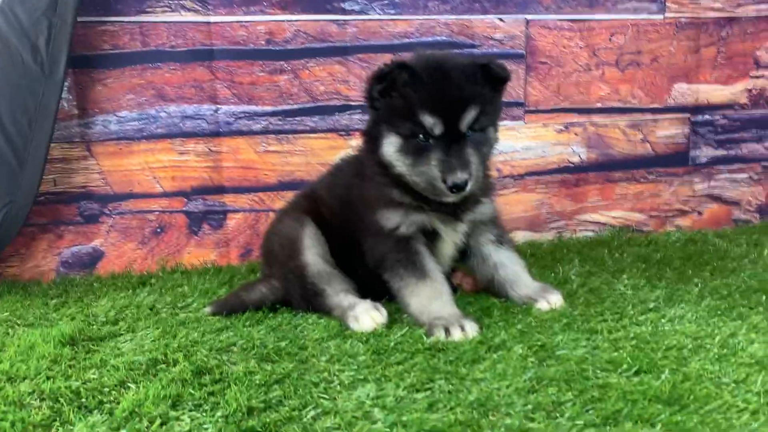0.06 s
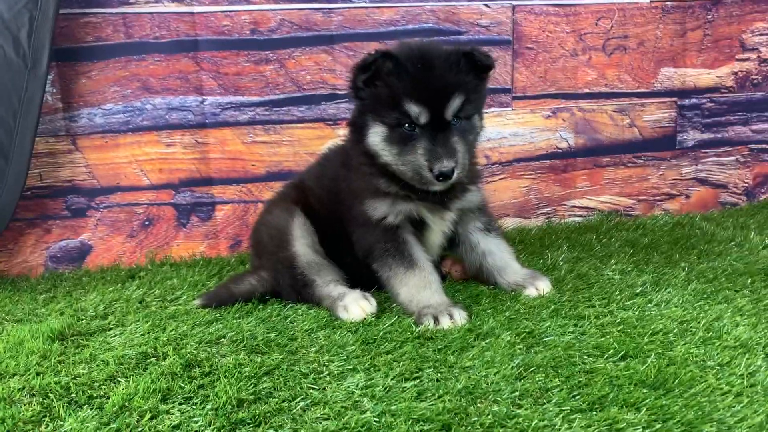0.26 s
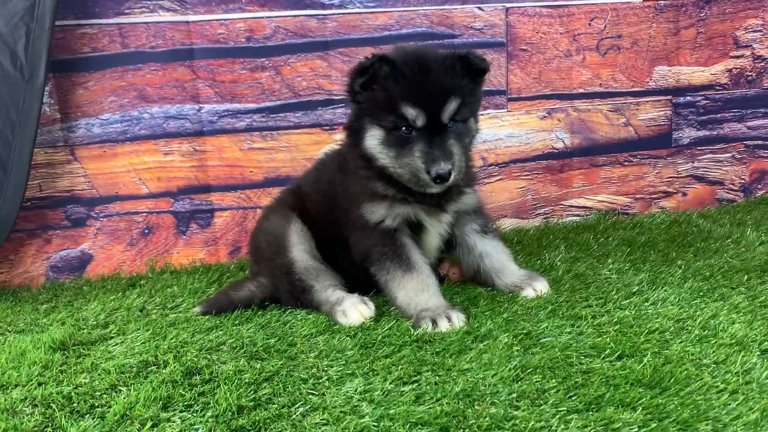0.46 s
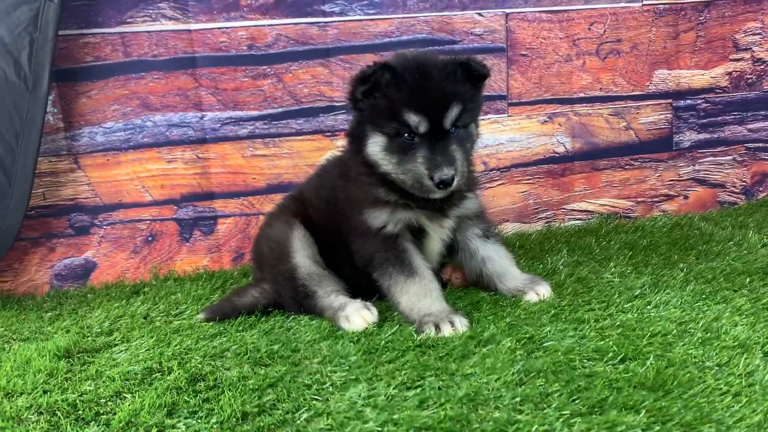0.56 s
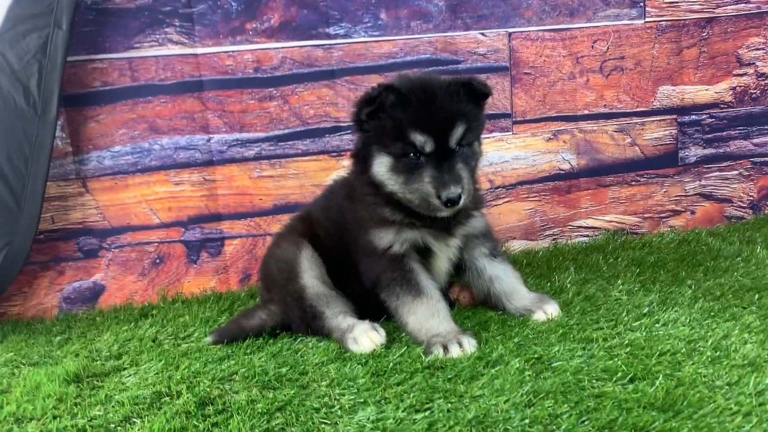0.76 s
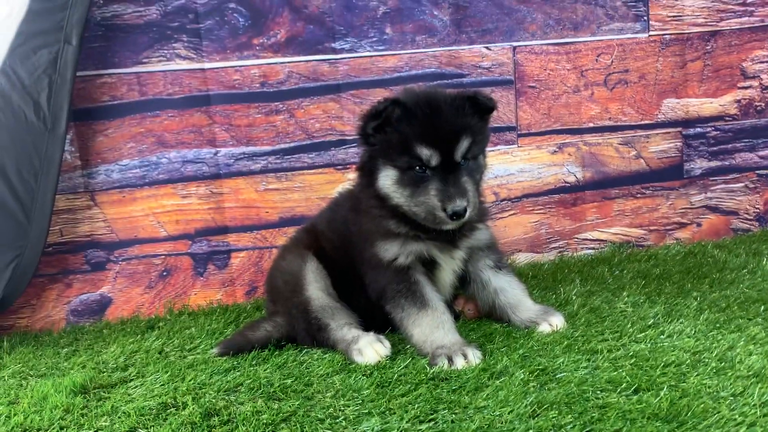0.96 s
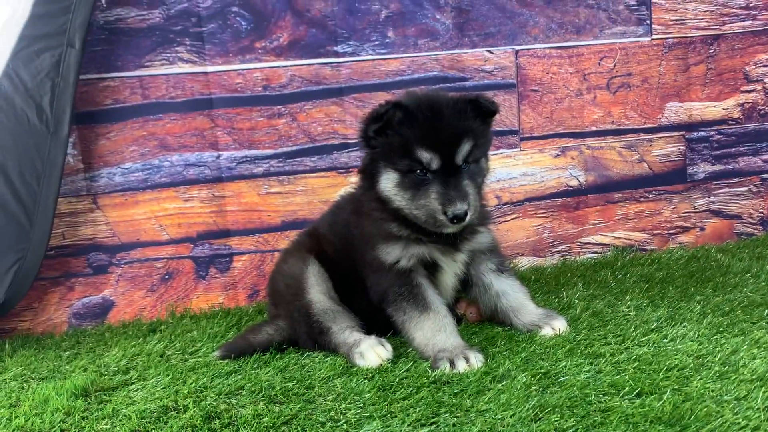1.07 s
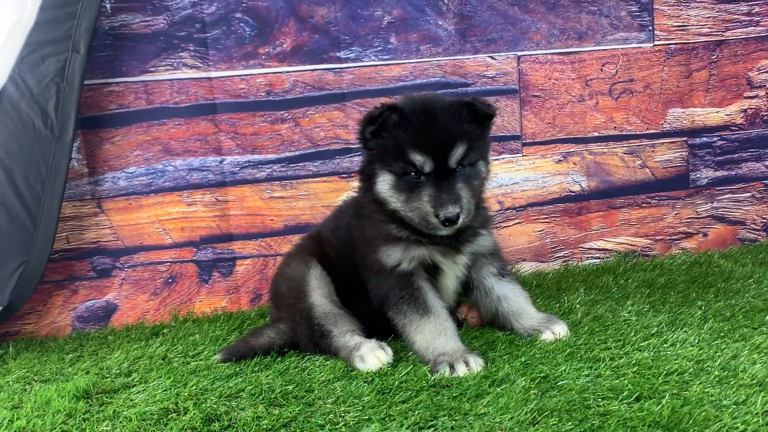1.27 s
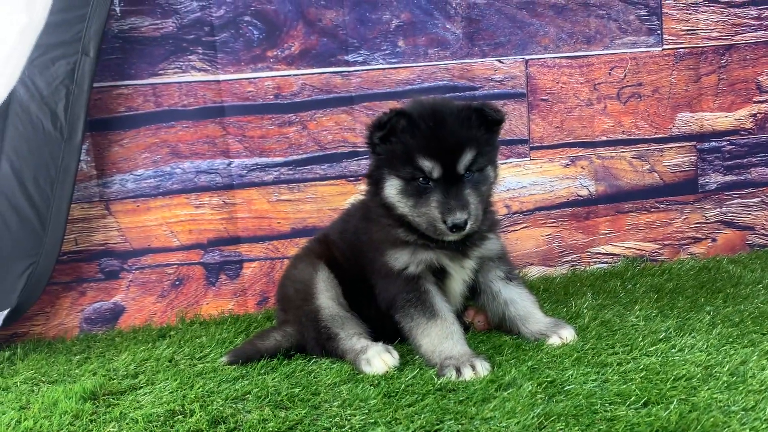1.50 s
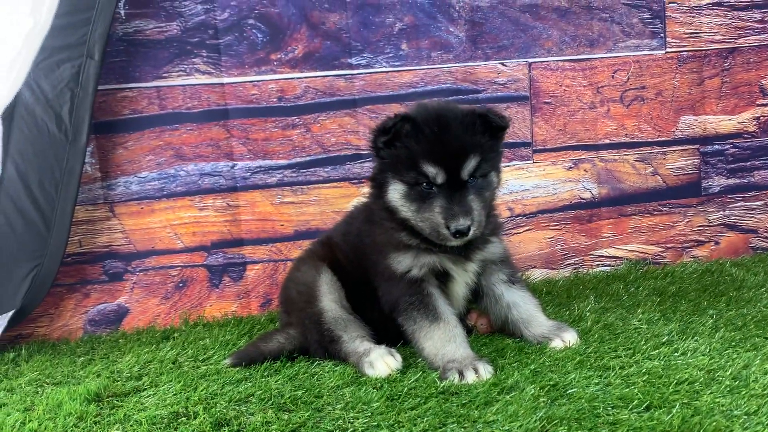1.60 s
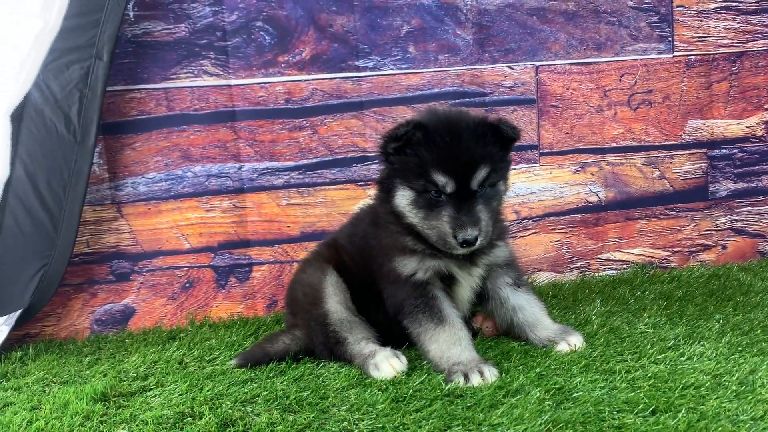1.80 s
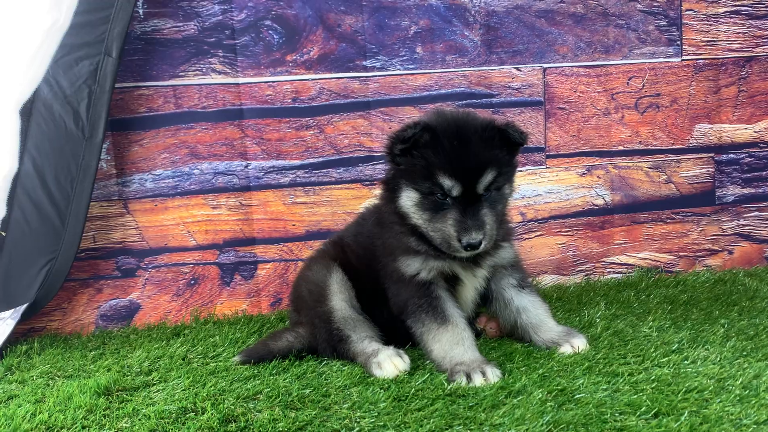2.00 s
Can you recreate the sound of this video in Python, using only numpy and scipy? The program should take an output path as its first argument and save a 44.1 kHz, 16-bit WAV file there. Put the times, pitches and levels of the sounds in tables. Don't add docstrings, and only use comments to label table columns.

```python
import sys
import numpy as np
from scipy import signal
from scipy.fft import rfft, irfft
from scipy.io import wavfile
from scipy.ndimage import uniform_filter1d

SR = 44100
rng = np.random.default_rng(int(sys.argv[2]) if len(sys.argv) > 2 else 0)


def unload_wav(signal):
    wavfile.write(
        sys.argv[1],
        SR,
        np.round(np.clip(np.atleast_2d(signal).T, -1, 1) * 32767).astype(np.int16),
    )


def gain_from_db(level_db):
    decades = np.asarray(level_db, float) / 20
    return 10 ** decades


N = 90404

# time_s, pitch_hz, level_db
SQUEAKS = [
    [(.209, 771.6, -50.5), (.215, 1052, -28.5), (.244, 1284, -19), (.257, 1396, -25), (.27, 1394, -19.5),
     (.283, 1330, -26), (.297, 1185, -22), (.315, 1051, -35.5), (.345, 860, -50)],
    [(.389, 855, -60), (.393, 912, -31.5), (.416, 878, -31), (.426, 855.8, -42), (.46, 797.5, -53)],
    [(.586, 763.5, -44.5), (.594, 1105, -29.5), (.604, 1086, -29.5), (.617, 1146, -24), (.633, 1147, -27),
     (.648, 1116, -30.5), (.664, 1028, -29.5), (.682, 944.6, -42.5), (.705, 833, -53.5)],
    [(.949, 748, -52), (.954, 1058, -31), (.966, 1146, -23.5), (.984, 1300, -21), (.996, 1379, -21.5),
     (1.01, 1359, -23.5), (1.024, 1302, -23.5), (1.038, 1127, -27), (1.075, 860, -49)],
]
GRIP_TILT = [0.1, -2, 1.5, 0.1]
# freq_hz, gain_db
WHISTLE = [(900, -15), (1250, -10), (2800, -13.5), (4000, -14), (5500, -10.5), (8500, -11.5),
           (11000, -18.5), (15000, -23.5)]
# start_s, peak_db, knock_hz, decay_s, tick_db
THUDS = [(.179, -50, 226.5, .02, -37), (.205, -48.5, 200, .025, -36), (0.247, -48.5, 111, .02, -37.5),
         (.41, -47.5, 228, .025, -13.5), (0.602, -55, 130, .04, -33), (.866, -47, 220, 0.031, -32.5),
         (0.8668, -56.5, 800, .004, -13), (.96, -53.5, 250.6, 0.022, 0), (1.234, -54, 252.6, 0.012, -17.5),
         (1.3115, -37, 398.6, .003, -19), (1.327, -45.5, 110, .012, -30.5),
         (1.311, -42.5, 910, 0.0027, -12.5), (1.435, -76.5, 406.5, 0.01, -25)]
# freq_hz, gain_db
RUSTLE = [(300, 3.5), (700, -10.5), (1400, 0.5), (1950, 2), (2700, -12), (4000, 0), (5800, -16.5),
          (14000, -19)]
# freq_hz, t60_s
ROOM_T60 = [(300, 0.59), (1000, 0.27), (2500, 0.24), (5000, 0.32), (9000, 0.31), (14000, 0.073)]
# delay_s, left_db, right_db
ECHOES = [(.0021, 1, -15), (.0057, 6, -19), (.012, -5, -8), (.021, -16.5, -0.5)]
# freq_hz, difference_db
PAN = [(300, 0), (880, -9), (1300, 0), (2800, 10), (5000, -8), (9000, -8), (13000, -3)]
# freq_hz, gain_db
ROOM_TONE = [(25, -15.5), (80, -11), (200, -22.5), (440, -30.5), (700, -37), (1500, -42.5), (3000, -55.5),
             (15000, -73)]
# time_s, level_db
RUMBLE = [(0.0, -56), (0.04, -53), (0.29, -53), (0.31, -63.5), (0.47, -52), (0.64, -66.5), (0.73, -52),
          (0.86, -49), (1.03, -61), (1.08, -51), (1.12, -67.5), (1.26, -47), (1.43, -63), (1.54, -54),
          (1.64, -69), (1.7, -48.5), (1.92, -55.5), (2.05, -50)]


def table(rows, hz):
    rows = np.array(rows, float)
    return np.interp(np.log(np.maximum(hz, 1)), np.log(rows[:, 0]), rows[:, 1])


def unit(x):
    return x / np.sqrt(np.mean(x ** 2))


def shaped(gain, size=N):
    spectrum = rfft(rng.standard_normal(size))
    return unit(irfft(spectrum * gain(np.fft.rfftfreq(size, 1 / SR)), size))


def walk(rate_hz):
    return shaped(lambda f: 1 / (1 + (f / rate_hz) ** 2))


def cavity(hz):
    centre_hz, width_hz, peak_db = 6723, 1380, 1.5
    return gain_from_db(peak_db) / (1 + (2 * (hz - centre_hz) / width_hz) ** 2)


def whistle(hz):
    return gain_from_db(table(WHISTLE, hz)) + cavity(hz)


def escaping_air():
    from_hz = 9000
    return shaped(lambda f: gain_from_db(table(WHISTLE, f)) / (1 + (from_hz / (f + 1)) ** 6) + cavity(f))


def reed_catch(t):
    below_squeak_db, decay_s, lead_s = -18, .004, .002
    noise = shaped(lambda f: 1 / (1 + (700 / (f + 1)) ** 4) / (1 + f / 6000))
    level = 0
    for squeak in SQUEAKS:
        _, (onset_s, _, onset_db) = squeak[:2]
        fall = np.exp(-np.maximum(t - onset_s, 0) / decay_s)
        level = level + gain_from_db(onset_db + below_squeak_db) * fall * (t > onset_s - lead_s)
    return level * noise


def puff_level(t):
    below_squeak_db, rise_s = -27, 0.017
    level = 0
    for squeak in SQUEAKS:
        _, (onset_s, _, onset_db) = squeak[:2]
        rise = np.exp(-np.maximum(onset_s - t, 0) / rise_s)
        level = level + gain_from_db(onset_db + below_squeak_db) * rise * (t < onset_s)
    return level


def squeaker(t):
    wobble, air_db = 0.00067, -16
    soft_tilt, full_squeeze_db = 0.31, -18
    flutter_db, flutter_hz = 2.0, 18
    rows = np.concatenate(SQUEAKS)
    pitch_hz = uniform_filter1d(np.interp(t, rows[:, 0], rows[:, 1]), size=130)
    pitch_hz = pitch_hz * (1 + wobble * walk(150))
    level_db = np.interp(t, rows[:, 0], rows[:, 2])
    sounding = sum(1. * (t > s[0][0]) * (t < s[-1][0]) for s in SQUEAKS)
    sounding = uniform_filter1d(sounding, size=90)
    phase = 2 * np.pi * np.cumsum(pitch_hz) / SR
    grip_tilt = np.interp(t, [s[2][0] for s in SQUEAKS], GRIP_TILT)
    tilt = soft_tilt * (level_db - full_squeeze_db) + grip_tilt

    air = escaping_air()
    tone = gain_from_db(air_db) * air
    for k, start in enumerate(rng.uniform(0, 2 * np.pi, size=16), start=1):
        overtone_hz = k * pitch_hz
        gain = whistle(overtone_hz) * gain_from_db(tilt * np.log2(k) + flutter_db * walk(flutter_hz))
        tone = tone + gain * (overtone_hz < SR / 2.6) * np.sin(k * phase + start)
    return tone * gain_from_db(level_db) * sounding * np.sqrt(2) + puff_level(t) * air + reed_catch(t)


def thuds(t):
    out = 0
    for start_s, peak_db, knock_hz, decay_s, tick_db in THUDS:
        def colour(f):
            detune = f / knock_hz - knock_hz / (f + 1)
            knock = 1 / (1 + (1.9 * detune) ** 2) ** 0.93
            return knock + gain_from_db(tick_db) / (1 + (f / 4000) ** 2)
        fall = (t > start_s) * np.exp(-np.maximum(t - start_s, 0) / decay_s)
        out = out + gain_from_db(peak_db) * shaped(colour) * fall
    return out


def rustle(t):
    start_s, rise_s, level_db = 1.978, 0.0164, -58
    rise = np.clip((t - start_s) / rise_s, 0, 1) ** 2
    noise = shaped(lambda f: gain_from_db(table(RUSTLE, f)) * (f > 250))
    return gain_from_db(level_db + 2.0 * walk(56)) * rise * noise


def reverb_tail(t):
    level_db, gap_s = -4.5, 0.0022
    tail = 0
    for hz in 60 * 2. ** np.arange(9):
        band = shaped(lambda f: np.maximum(1 - np.abs(np.log2(f / hz + 1e-9)), 0) ** .5, size=len(t))
        decay = gain_from_db(-60 * t / max(table(ROOM_T60, hz), .05))
        tail = tail + np.sqrt(hz / SR) * band * decay
    tail = tail * np.clip(t / gap_s - 1, 0, 1)
    return gain_from_db(level_db) * tail / np.sqrt(np.sum(tail ** 2))


def room(x):
    left_lag_s, alike_hz, balance_db = .0001, 880, -1
    size = SR * 3 // 4
    margin = 64
    t = np.arange(size) / SR
    f = np.fft.rfftfreq(size, 1 / SR)
    mid_tail, side_tail = [rfft(reverb_tail(t)) for _ in range(2)]
    apart = f / (f + alike_hz)
    fade = np.clip(4 - 5 * t / t[-1], 0, 1)

    def late(delay_s):
        return np.exp(-2j * np.pi * f * (delay_s + margin / SR))

    out = []
    for sign, lag_s in ((1, left_lag_s), (-1, 0)):
        early = gain_from_db(table(PAN, f) * sign / 2) * late(lag_s)
        for delay_s, left_db, right_db in ECHOES:
            echo_db = (left_db + right_db) / 2 + apart * sign * (left_db - right_db) / 2
            early = early + gain_from_db(echo_db) * late(delay_s + lag_s)
        tail = (mid_tail + sign * apart * side_tail) / np.sqrt(1 + apart ** 2)
        response = irfft(early + tail, size) * fade
        heard = signal.fftconvolve(x, response)[margin:N + margin]
        out.append(gain_from_db(balance_db * sign / 2) * heard)
    return np.array(out)


def room_tone():
    level_db, side_db, alike_hz = -61, -9, 500
    mid = shaped(lambda f: gain_from_db(table(ROOM_TONE, f)) / (1 + (45 / (f + 1)) ** 4))
    side = gain_from_db(side_db) * shaped(lambda f: gain_from_db(table(ROOM_TONE, f)) * f / (f + alike_hz))
    return gain_from_db(level_db + walk(12)) * (mid + side * np.array([[1], [-1]]))


def rumble(t):
    centre_hz, drift = 54, .05
    phase = 2 * np.pi * np.cumsum(centre_hz * (1 + drift * walk(6.6))) / SR
    level_db = np.interp(t, *np.array(RUMBLE).T) + np.array([[-.4], [.4]])
    return np.sqrt(2) * np.sin(phase) * gain_from_db(level_db)


def hiss():
    return gain_from_db(-86.5) * rng.standard_normal((2, N))


def scene():
    t = np.arange(N) / SR
    sources = squeaker(t) + thuds(t) + rustle(t)
    return room(sources) + room_tone() + rumble(t) + hiss()


def band_limit(x):
    return signal.sosfilt(signal.butter(12, 15770, fs=SR, output="sos"), x)


def record(dry):
    notch_hz, notch_width_hz, notch_db = 11677, 330, -60
    lift_hz, lift_width_hz, lift_db = 13940, 370, 8.5
    top_hz = 14550
    f = np.fft.rfftfreq(N, 1 / SR)
    lift = lift_db * np.exp(-((f - lift_hz) / lift_width_hz) ** 4)
    notch = notch_db * np.exp(-((f - notch_hz) / notch_width_hz) ** 4)
    response = gain_from_db(lift + notch) / (1 + (f / top_hz) ** 120) ** .5
    mix = irfft(rfft(dry) * response, N)
    return band_limit(mix)


dry = scene()
out = record(dry)
unload_wav(out)
```